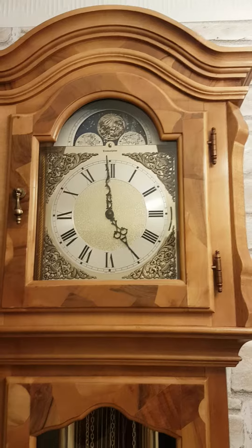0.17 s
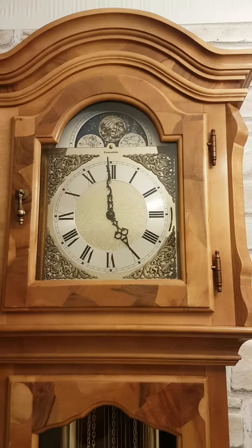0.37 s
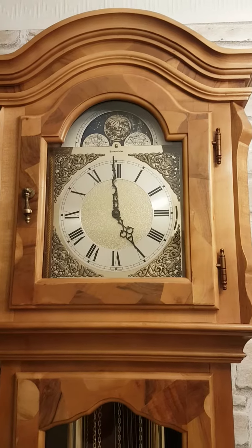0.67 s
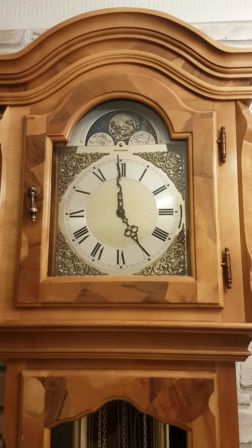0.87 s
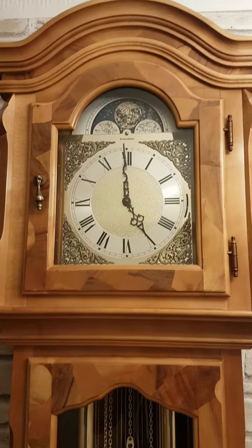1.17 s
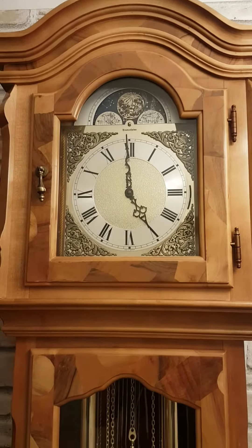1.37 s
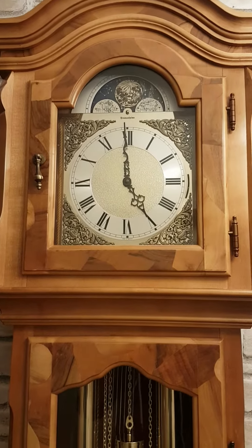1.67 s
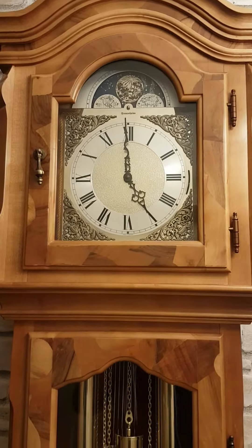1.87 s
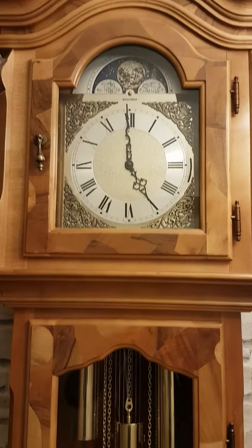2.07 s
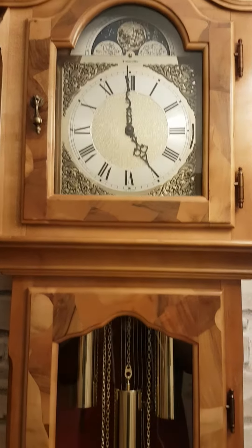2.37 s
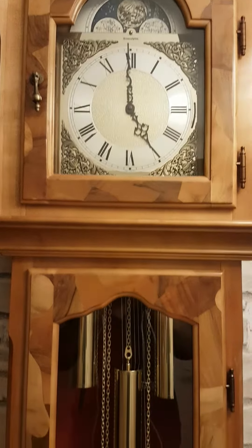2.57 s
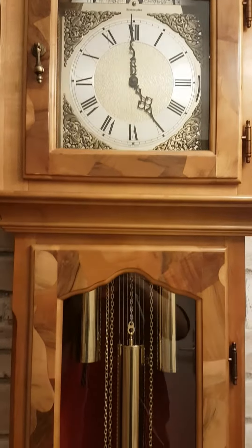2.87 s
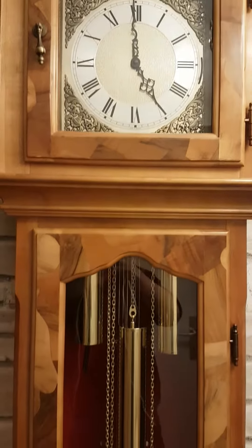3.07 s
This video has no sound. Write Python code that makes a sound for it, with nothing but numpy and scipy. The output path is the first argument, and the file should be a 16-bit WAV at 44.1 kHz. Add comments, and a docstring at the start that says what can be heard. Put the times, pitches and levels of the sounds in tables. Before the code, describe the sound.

Soft, slightly echoing ticks come from a slow tall clock and a quicker, lighter one. A sharp handling bump opens on the hand-held microphone's right side, then the ticking carries on indoors over steady hum and hiss.

```python
"""Pendulum clocks in a quiet room

Room tone from a hand-held camera's stereo microphones: mains hum, room noise, hiss and a thin whine.
Out in the room, escapements knock softly on their cases and the walls smear each tick: a slow tall clock,
a quicker lighter one and a faint ringing beat. Right at the microphone, fingers bump and rub the
right port, which hisses while it is covered and clicks when it is let go."""
import sys
import numpy as np
from scipy.fft import rfft, irfft, next_fast_len
from scipy.io import wavfile
from scipy.ndimage import map_coordinates

SR = 44100
rng = np.random.default_rng(int(sys.argv[2]) if len(sys.argv) > 2 else 0)


def wrap_up_sound(samples):
    """Save the sound to the file named by the first command line argument, as 16-bit audio."""
    columns = np.atleast_2d(samples).T
    # keep every value between -1 and 1, then stretch to whole-number steps
    tamed = np.clip(columns, -1, 1)
    steps = np.round(tamed * 32767).astype(np.int16)
    wavfile.write(sys.argv[1], SR, steps)


N = 142002
T = np.arange(N) / SR

# spectra of the room tone and the microphones' own hiss: f/Hz, relative level/dB
ROOM_SPECTRUM = [(20, -10), (50, 1.5), (130, -3.5), (260, -2), (480, -7.5), (1000, -12), (2000, -14.5),
                 (4000, -21.5), (8000, -33), (16000, -56)]
HISS_SPECTRUM = [(100, 4.5), (4000, -3.5), (6500, -4), (8500, -2.5), (11000, 1), (14000, 5.5), (16000, 3)]
# likeness of the room tone at the two microphones: f/Hz, correlation
ROOM_CORRELATION = [(60, 0.042), (130, 0.096), (290, 0.021), (640, 0.1), (1400, 0.003), (15000, 0.09)]
# electronic whine: f/Hz, width/Hz, starting level/dB
WHINE_BANDS = [(14420, 110, -92.5), (15140, 90, -98.5)]
# mains hum: f/Hz, left level/dB, right level/dB, throb depth/dB
HUM_LINES = [(98.4, -68, -72, 4), (145.5, -75.5, -74, 1), (245.7, -78, -76.5, 0), (297.5, -81, -81, -0.5),
             (640, -92, -79.5, -0.5), (1235, -84.5, -88, -1)]
# swell of the deep drone under the hum: t/s, level/dB
DRONE_LEVELS = [(.1, -76), (.6, -77), (.95, -74), (1.38, -70), (1.7, -75.5), (2.2, -79), (2.75, -78),
                (3.0, -71.5), (3.2, -67.5)]
# spectra of the covered port's hiss and of a rubbing finger: f/Hz, relative level/dB
COVERED_SPECTRUM = [(100, -8), (600, -20), (1000, -9.5), (2000, -9.5), (2600, -4.5), (3150, 1.5),
                    (3700, -5), (4400, -10), (6200, -8), (6800, -14), (7500, -33.5), (10000, -55)]
RUB_SPECTRUM = [(30, -27.5), (110, 12.5), (300, 1.5), (600, -15), (1500, -27), (5000, -47)]
# colour the microphone port gives a bump: f/Hz, gain/dB
PORT_RESPONSE = [(30, -0.5), (150, 4.5), (700, 0.5), (1100, 3), (1600, 1), (2400, 5), (4000, 2), (6000, 2),
                 (7300, -5), (9000, -14), (11000, -3.5), (13000, -1.5), (16000, -7)]
# finger contacts: t/s, push level/dB, push f/Hz, push Q, thud f/Hz, thud re push/dB, crack re push/dB
FINGER_CONTACTS = [(0.0694, -8.5, 550, 0.7, 95, -14, -2), (.1102, -1, 1390, 1.75, 262, -16.5, -17.5),
                   (0.1123, -17, 413, 0.42, 126, -4.5, -40), (.172, -39, 1510, 0.34, 198, -21, -17),
                   (0.1788, -40.5, 647, 2.1, 200, -28, -25), (.184, -41, 650, 2.9, 196, -12, -24),
                   (0.2094, -30.5, 270, 0.23, 182, -3.5, -35), (0.2142, -32.5, 280, 0.27, 179, -2, -38),
                   (0.6105, -38, 426, 1.3, 250, -10.5, -45), (1.7949, -35, 2920, 8.8, 1420, 0.5, -46),
                   (1.7981, -34, 2840, 6, 870, -8.5, -47), (2.174, -46.5, 6050, 0.67, 900, -23.5, -5.5),
                   (2.2662, -29.5, 435, 0.87, 153, -16, -27), (2.721, -54, 280, 1, 248, 0.5, -30),
                   (2.805, -45, 960, 2.7, 189.5, 1.5, -22), (2.8351, -46.5, 144, 1.9, 126, -2.5, -30),
                   (2.8743, -46, 1570, 2.4, 143, 4, -18), (3.1437, -37, 3350, 1.1, 800, -34, -34)]
# beats of each clock: t/s, relative level/dB
SLOW_TICKS = [(.512, -65), (1.290, -59.5), (2.338, -59), (3.109, -61.5)]
QUICK_TICKS = [(.297, -68), (.817, -70), (1.474, -68), (1.995, -70), (2.654, -69), (3.176, -69.5)]
RINGING_TICKS = [(.235, -71), (1.03, -70.5), (1.605, -66.5), (2.385, -65), (2.965, -65)]
# modes of each clock case: f/Hz, width/Hz, relative level/dB, t60 of the room tail/s
SLOW_CASE = [(717, 76, -11, 0.38), (896, 32.7, -6.5, 0.26), (1236, 116, -12, 0.38), (1560, 200, -8.5, 0.48),
             (2143, 130, 2, 0.28), (2440, 148, -3, 0.33), (3270, 350, -12, 0.38), (5560, 1550, -15.5, 0.45)]
QUICK_CASE = [(753, 100, -2.5, 0.23), (943, 25, -4.5, 0.42), (1233, 240, -1.5, 0.1), (2040, 45, -1.5, 0.35),
              (2340, 320, 0, 0.27), (2830, 420, -6, 0.3), (3440, 100, -3, 0.076), (4600, 2700, -5.5, 0.23)]
RINGING_CASE = [(1549, 55, 0.003, 0.38)]

INPUT_OPENS_S, PORT_RELEASED_S = 0.068, 1.798


def amp(db):
    """Decibels to gain."""
    return 10 ** (np.asarray(db) / 20)


def unit(x):
    """Scale to rms 1."""
    return x / np.sqrt(np.mean(x ** 2) + 1e-20)


def along(points, hz):
    """Read (f/Hz, value) points on a log frequency axis."""
    f, v = np.transpose(points)
    return np.interp(np.log(hz + 1), np.log(f + 1), v)


def wobble(rate):
    """A smooth random curve, rate knots a second."""
    return map_coordinates(rng.standard_normal(int(N * rate / SR) + 4), [T * rate])


def filtered(x, response):
    """Pass x through a complex response of frequency."""
    size = next_fast_len(N + SR // 2)
    return irfft(rfft(x, size) * response(np.fft.rfftfreq(size, 1 / SR)), size)[..., :N]


def resonance(f, hz, width):
    """Causal response of one resonance."""
    return 1j * f * width / (hz * hz - f * f + 1j * f * width)


def minimum_phase(colour, size):
    """Causal response of a (f/Hz, gain/dB) colour."""
    cepstrum = irfft(np.log(amp(along(colour, np.fft.rfftfreq(size, 1 / SR)))))
    cepstrum[1:size // 2] *= 2
    cepstrum[size // 2 + 1:] = 0
    return np.exp(rfft(cepstrum))


def noise(spectrum):
    """Two unrelated coloured noises of rms 1."""
    return unit(filtered(rng.standard_normal((2, N)), lambda f: amp(along(spectrum, f))))


def band_noise(hz, width):
    """Two unrelated noises of rms 1 inside one steep resonance."""
    return unit(filtered(rng.standard_normal((2, N)), lambda f: resonance(f, hz, 2 * width) ** 2))


def gate(start, end, edge_s):
    """1 between two times, with short ramps."""
    return np.clip((T - start) / edge_s, 0, 1) * np.clip((end - T) / edge_s, 0, 1)


def room_tone(level_db=-65.5):
    """Diffuse room noise, nearly unrelated at the two microphones."""
    def mid_side_gains(f):
        angle = np.arccos(along(ROOM_CORRELATION, f)) / 2
        return np.array([np.cos(angle), np.sin(angle)])

    mid, side = filtered(noise(ROOM_SPECTRUM), mid_side_gains)
    return amp(level_db) * unit(np.array([mid + side, mid - side]))


def microphone_noise(hiss_db=-75.5, whine_db_per_s=3.5):
    """The microphones' own hiss and a thin electronic whine that grows."""
    whine = sum(amp(db) * band_noise(hz, width) for hz, width, db in WHINE_BANDS)
    return amp(hiss_db) * noise(HISS_SPECTRUM) + amp(whine_db_per_s * T) * whine


def mains_hum(drift_hz=0.97, flutter_db=-0.1, throb_peak_s=0.61, throb_period_s=0.72, drone_hz=48.5):
    """Slightly unsteady mains lines, the strongest throbbing, over a deep drone that swells and sinks."""
    drift = np.cumsum(drift_hz * wobble(6)) / SR
    throb = np.cos(2 * np.pi * (T - throb_peak_s) / throb_period_s)

    def line(hz):
        tone = np.sqrt(2) * np.sin(2 * np.pi * (hz * T + drift + rng.random()))
        return tone * amp(flutter_db * wobble(2.2))

    lines = sum(amp([[left_db], [right_db]]) * amp(depth_db * throb) * line(hz)
                for hz, left_db, right_db, depth_db in HUM_LINES)
    drone = amp(np.interp(T, *np.transpose(DRONE_LEVELS))) * line(drone_hz)
    return lines + drone


def finger_bumps(thud_q=1.6, crack_hz=6550, crack_q=0.26):
    """Each contact is a push of air, a thud of the housing and a tiny crack, heard through the port."""
    out = np.zeros(N + SR)
    size = 8192
    f = np.fft.rfftfreq(size, 1 / SR)
    port = minimum_phase(PORT_RESPONSE, size)

    def swing(hz, q):
        """One damped swing of peak 1, its edge softened by a low-pass an octave up."""
        rolloff = 1 + 1j * f / (2 * hz) - (f / (2 * hz)) ** 2
        wave = irfft(port * resonance(f, hz, hz / q) / rolloff)
        return wave / abs(wave).max()

    for s, db, hz, q, thud_hz, thud_db, crack_db in FINGER_CONTACTS:
        thud = amp(thud_db) * swing(thud_hz, thud_q)
        crack = amp(crack_db) * swing(crack_hz, crack_q)
        bump = swing(hz, q) + thud - crack
        out[round(s * SR):][:size // 2] -= amp(db) * bump[:size // 2]
    return out[:N]


def handling_noise(rub_db=-44.5, covered_db=-61, leak_db=-32, leak_hz=680):
    """Fingers bump, rub and cover the right port; a dull trace leaks through the housing to the left."""
    rub = amp(rub_db) * noise(RUB_SPECTRUM)[0] * gate(0.051, 0.2, edge_s=0.0046)
    touch = finger_bumps() + rub
    covered = gate(INPUT_OPENS_S, PORT_RELEASED_S, edge_s=0.004)
    hiss = amp(covered_db) * noise(COVERED_SPECTRUM)[0] * covered
    leak = filtered(touch, lambda f: resonance(f, leak_hz, width=450) * leak_hz / (leak_hz + 1j * f))
    return np.array([amp(leak_db) * leak, touch + hiss])


def clock(ticks, modes, direct_db, case_fade_s, right_db, tail_attack_s=0.003, case_attack_s=0.00093):
    """Each beat of the escapement rings the case; the room smears every mode into a diffuse tail."""
    direct, tails = np.zeros((2, N + SR)), np.zeros((2, N))
    t = np.arange(SR // 2) / SR
    tail_rise = 1 - np.exp(-t / tail_attack_s)
    case_rise = 1 - np.exp(-t / case_attack_s)
    case_envelope = amp(direct_db - 60 * t / case_fade_s) * case_rise
    for hz, width, mode_db, t60 in modes:
        tail_envelope = np.zeros(N + SR)
        damping = np.exp(-width * t / 2)  # on top of the case's fade: broad modes die sooner
        for (s, tick_db), phase in zip(ticks, rng.random((len(ticks), 2, 1))):
            start = round(s * SR)
            gain = amp(tick_db + mode_db)
            ring = damping * np.sin(2 * np.pi * (hz * t + phase))
            direct[:, start:start + len(t)] += gain * case_envelope * ring
            tail_envelope[start:start + len(t)] += gain * amp(-60 * t / t60) * tail_rise
        tails += tail_envelope[:N] * band_noise(hz, width)
    return (direct[:, :N] + tails) * amp([[0], [right_db]])


def clocks():
    """Three beats right of centre, each at its own pace; the ringing one is mostly room sound."""
    slow = clock(SLOW_TICKS, SLOW_CASE, direct_db=3.5, case_fade_s=0.44, right_db=1.5)
    quick = clock(QUICK_TICKS, QUICK_CASE, direct_db=6.5, case_fade_s=0.079, right_db=2.5)
    ringing = clock(RINGING_TICKS, RINGING_CASE, direct_db=-11, case_fade_s=0.17, right_db=7,
                    tail_attack_s=0.017)
    return slow + quick + ringing


def scene():
    """Clocks, room and fingers from the camera's position."""
    return clocks() + mains_hum() + room_tone() + microphone_noise() + handling_noise()


def record(dry):
    """The camera opens its input after a moment and keeps nothing above its band limit."""
    top_hz = 15800
    opening = np.clip((T - INPUT_OPENS_S) / 0.001, 0, 1)
    return filtered(dry * opening, lambda f: 1 / np.sqrt(1 + (f / top_hz) ** 160))


dry = scene()
out = record(dry)
wrap_up_sound(out)
```